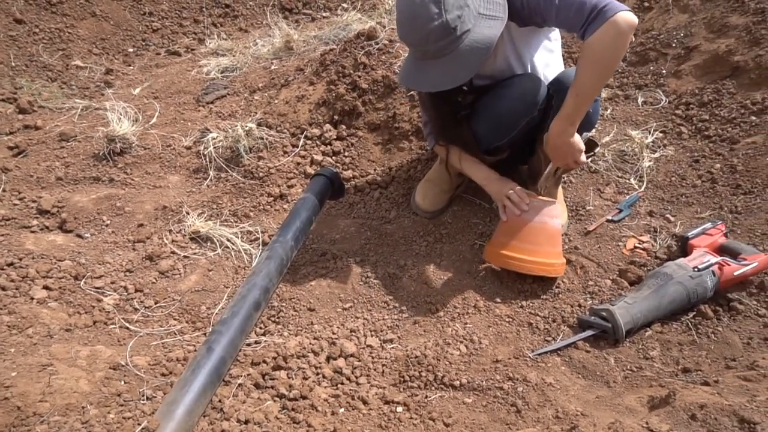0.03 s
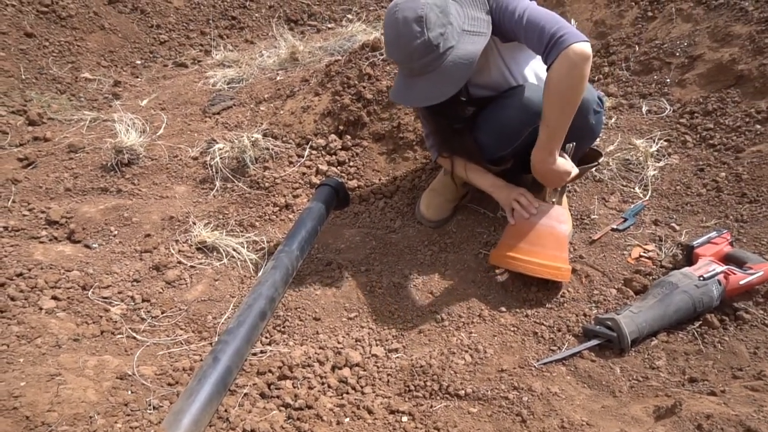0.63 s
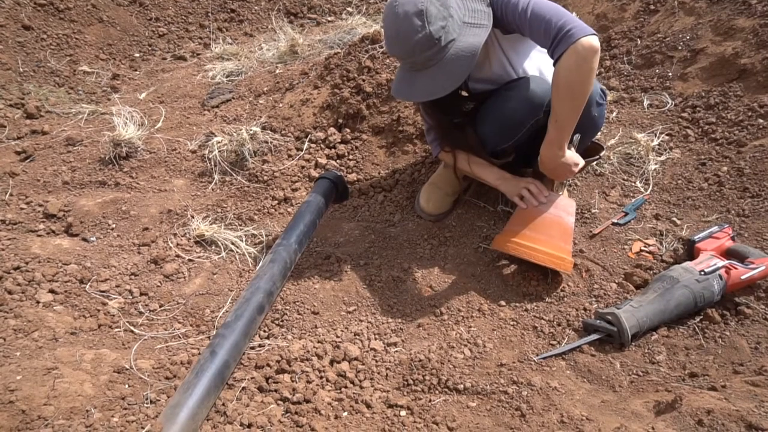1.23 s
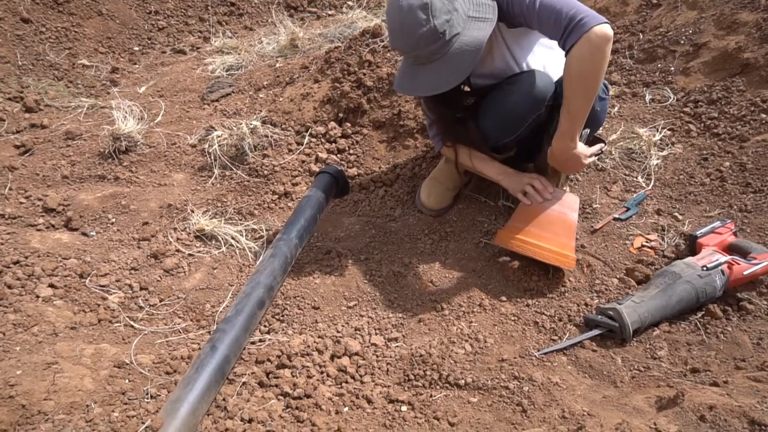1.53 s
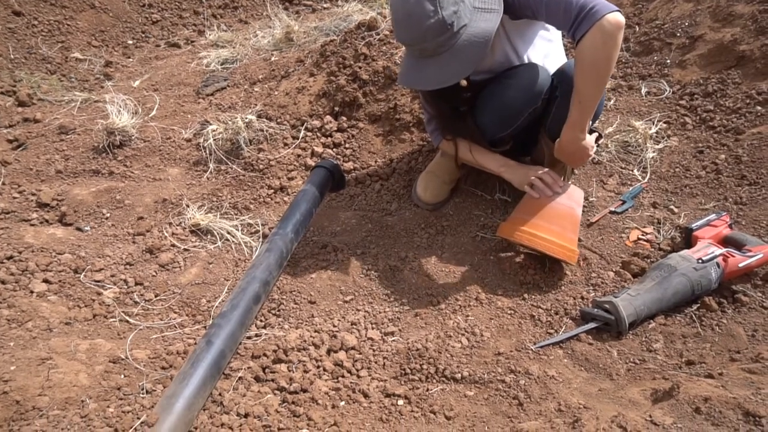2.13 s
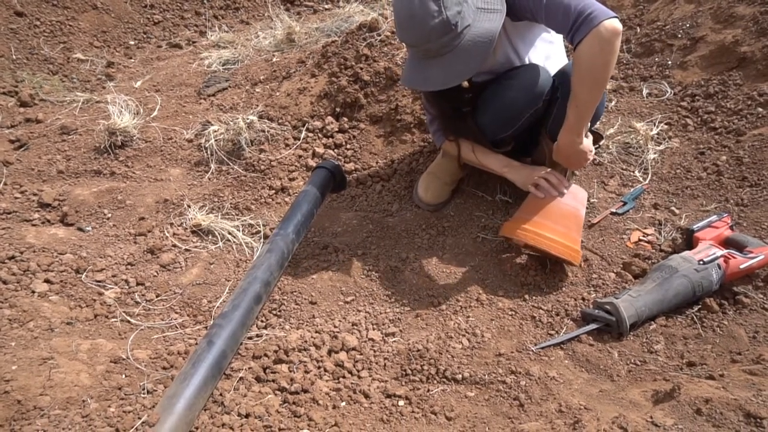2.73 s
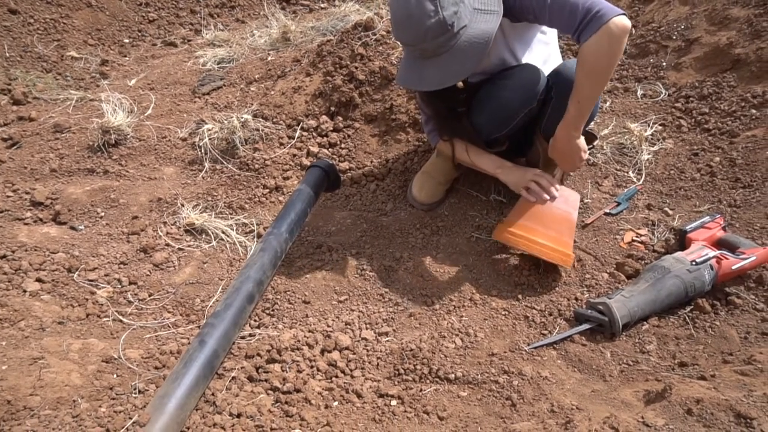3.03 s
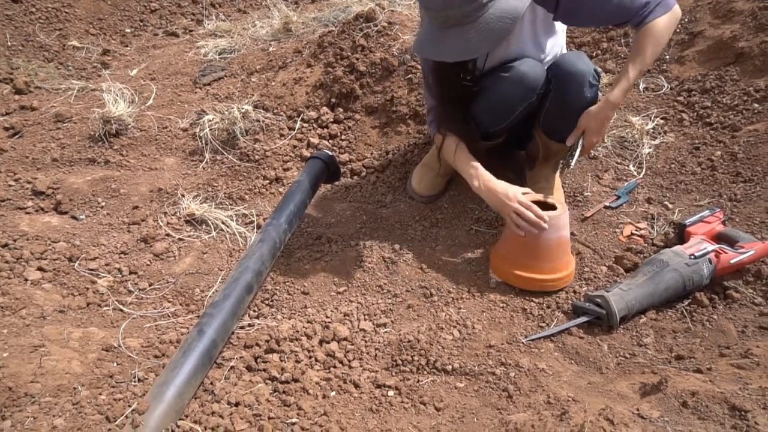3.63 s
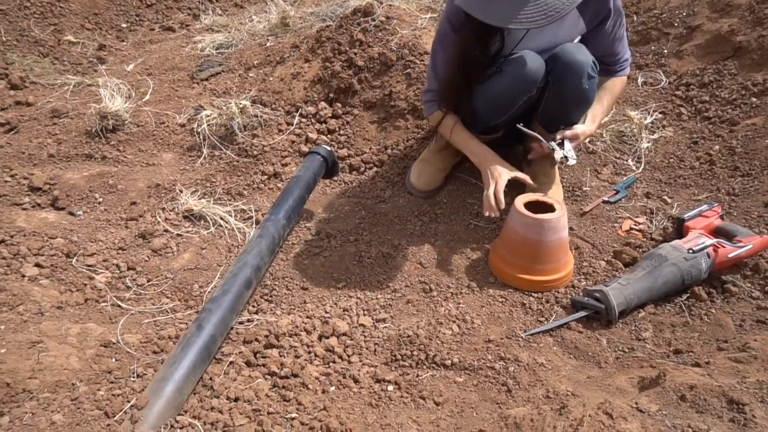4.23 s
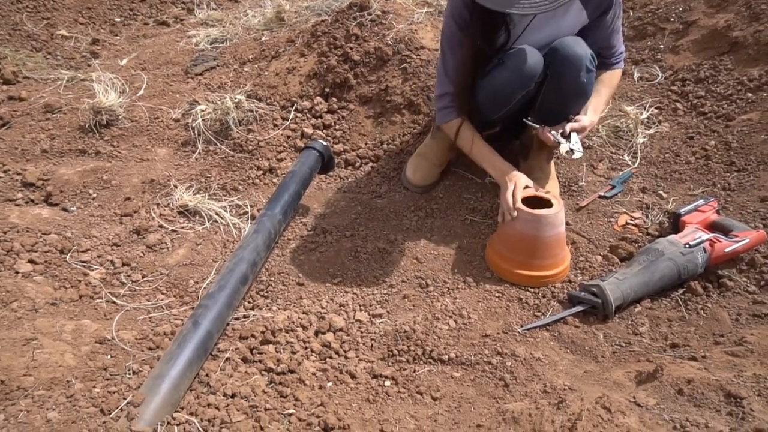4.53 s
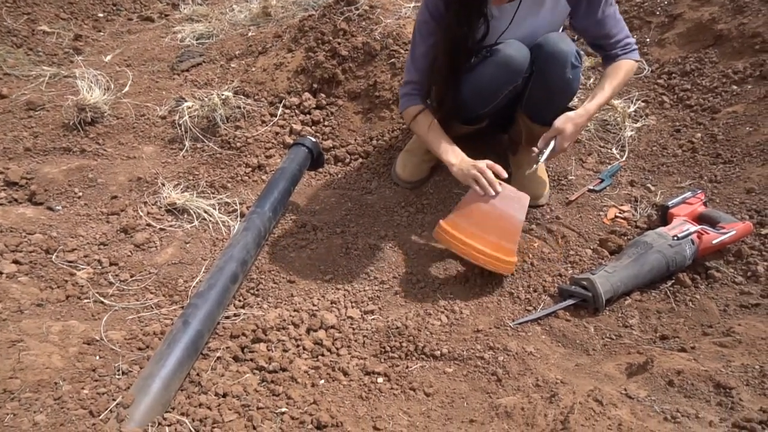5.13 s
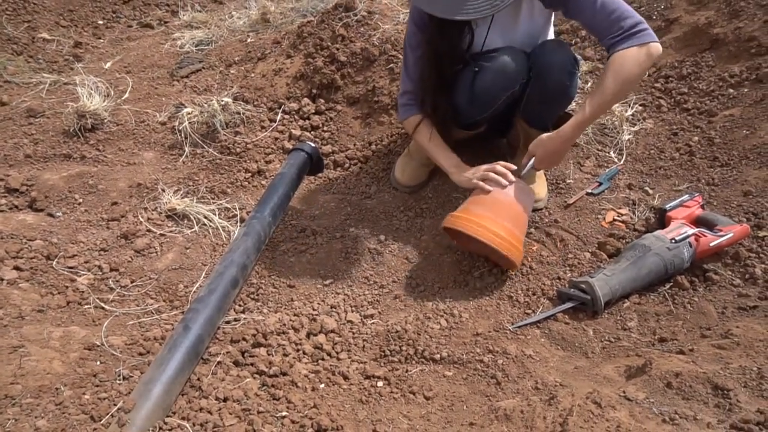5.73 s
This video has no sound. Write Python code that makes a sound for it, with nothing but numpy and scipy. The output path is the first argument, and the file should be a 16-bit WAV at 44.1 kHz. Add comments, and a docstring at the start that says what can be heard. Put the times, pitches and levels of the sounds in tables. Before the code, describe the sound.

Close ticks of pliers chipping a clay pot, a loud crunch, a metal clack, then the pot dragged over grit outdoors.

```python
"""Steel pliers nibble at the hole in the base of a terracotta pot, outdoors on gravelly soil.
The jaws tick and grind on the clay, crumbs snap off, and one piece cracks away with a loud crunch.
The pot is let down and rings freely, the loose pliers clack, and the pot is dragged and tipped on grit.
The work is close, nearly straight ahead of a stereo microphone; behind it are rustling clothes,
dull thuds on the ground, a faint hiss and light wind on the microphone."""
import sys
import numpy as np
from scipy import signal
from scipy.fft import rfft, irfft, next_fast_len
from scipy.io import wavfile

SR = 44100
rng = np.random.default_rng(int(sys.argv[2]) if len(sys.argv) > 2 else 0)


def file_out(sig):
    """Save sig as 16-bit WAV at sys.argv[1]."""
    # one column per channel
    cols = np.atleast_2d(sig).T
    # limit, then scale
    lim = np.clip(cols, -1, 1)
    pcm = np.round(lim * 32767).astype(np.int16)
    wavfile.write(sys.argv[1], SR, pcm)


N = 255339
T = np.arange(SR // 2) / SR  # time since a contact [s]

# Levels are relative within each table; tilts pivot at 4500 Hz.
# jaws catching the clay: (time [s], level [dB], tilt [dB/octave], attack noise [dB], top treble [dB])
BITES = [(0.395, -30.5, -11, -12, -5), (0.5894, -28, 1, -4, -3), (0.6087, -22.5, 4, -1.5, -1),
         (0.7093, -32, -3, -3, 2), (0.8724, -29.5, -8, 2, 11), (0.9365, -28, 0, 5, -5),
         (0.9504, -26, -1.5, 9, -5), (1.085, -29.5, 3.5, -1, 0), (1.1868, -32.5, 2, 12, -3.5),
         (2.011, -30, 2.5, -16, 4), (2.0578, -32.5, 12, -1, 1), (2.1069, -21.5, -8.5, 6, 14),
         (2.2532, -31.5, 4.5, 10, -10), (2.2712, -29.5, -0.5, 8, 0), (2.3975, -32.5, -5, -6, 9),
         (2.9903, -9.5, -1, 0, 0.5), (3.1294, -4, 0.5, 3, -9.5), (3.1614, -18.5, 15, 1, -14)]
# jaws sliding on the clay: (time [s], length [s], level [dB], tilt [dB/octave])
GRINDS = [(0.589, 0.0077, -31, -3.5), (0.633, 0.01, -33.5, 11), (0.643, 0.063, -43.5, 1.5),
          (0.731, 0.054, -53, 0), (0.851, .044, -49, -5.5), (1.084, 0.04, -45, 3), (1.137, .04, -51.5, -3),
          (1.299, 0.052, -52, 1.5), (1.423, 0.058, -55, 6), (1.479, 0.069, -50.5, 2.5),
          (1.605, .037, -55.5, -3.5), (1.778, 0.045, -46, 10), (1.826, 0.031, -48.5, 17),
          (2.058, 0.045, -48, -1), (2.37, 0.03, -57, 13), (3.144, 0.0092, -30.5, -6.5)]
# dull bumps on the soil, from the pot or a foot: (time [s], level [dB], pitch [ratio])
BUMPS = [(0.3941, -22.5, 0.94), (0.6068, -18.5, 0.98), (.9485, -32.5, 0.94), (1.086, -35, 0.68),
         (1.184, -37, 0.93), (2.1065, -20.5, 1.02), (2.273, -31, 0.97), (2.917, -20.5, 0.87),
         (2.935, -16.5, 1.05), (3.129, -20, 0.76), (3.745, -37, 0.61), (4.574, -38.5, 0.88),
         (4.985, -34, 0.78), (5.253, -34.5, 1)]
# short, sharp events: (time [s], level [dB], tilt [dB/octave])
CRUMB_SNAPS = [(0.134, -25, 3.5), (0.151, -26, 2), (0.3994, -32.5, 4), (0.708, -31.5, 1),
               (0.8874, -18, 4.5), (0.9007, -24.5, 3), (1.3242, -32, 2), (1.4538, -30, -2.5),
               (1.4944, -33.5, -10), (2.7556, -27, -1), (2.7762, -30.5, -3), (3.435, -42.5, -9.5),
               (4.3828, -39, -4.5), (5.4988, -34.5, 0.5)]  # crumbs breaking off
CRACK_JUMPS = [(2.9064, -21, 1), (2.9112, -24, -2), (2.9155, -14, -0.5), (2.9199, -14, -1),
               (2.925, -15.5, 6.5), (2.929, -25, -2.5), (2.9345, -15, -1), (2.938, -19.5, 1)]  # the crack that frees the piece
CLACKS = [(3.912, -29, 8), (3.9175, -15, 0), (3.9215, -1, 0), (3.9257, -0.5, 7.5), (3.932, -11.5, 2),
          (3.952, -14.5, 9), (3.9949, -20, 7), (4.1025, -28, 3), (4.472, -28, 4)]  # the loose pliers
STONE_KNOCKS = [(3.045, -31, -2), (3.743, -25.5, -5.5), (4.84, -29, 0.5), (4.905, -26.5, 16),
                (4.914, -19.5, -4), (4.968, -13, 5.5), (5.043, -26, -3), (5.053, -20, 3), (5.104, -56, -7),
                (5.184, -31, -4), (5.223, -28.5, -6.5)]  # the free pot striking stones
# the rim on the soil, one stroke as it is let down, one as it is pulled and tipped: (time [s], force [dB])
DRAG_STROKES = [
    [(3.3, -73.5), (3.56, -60), (3.70, -53.5), (3.75, -45), (3.83, -61), (3.885, -52), (3.93, -64)],
    [(4.5, -65), (4.56, -57), (4.63, -70), (4.70, -56), (4.89, -51), (4.97, -42), (5.02, -52.5),
     (5.09, -36), (5.14, -51), (5.19, -48.5), (5.3, -52), (5.38, -68), (5.5, -59), (5.57, -93)],
]
# effort of the crouching worker, heard as rustling of clothes and soil: (time [s], level [dB])
EFFORT = [(0.0, -71.5), (1.71, -69.5), (2.03, -61), (3.19, -66), (3.48, -67.5), (3.74, -65.5),
          (4.01, -69.5), (4.24, -68), (5.06, -67), (5.42, -69), (5.79, -68.5)]
# low wind swells and two short, dull thuds on the ground: (peak time [s], half length [s], level [dB])
LOW_SWELLS = [(2.05, 0.17, -65), (2.58, 0.21, -62.5), (3.044, .04, -61), (3.668, .025, -48),
              (4.585, .04, -44), (5.267, 0.081, -64)]

# modes: (frequency [Hz], level [dB], t60 [s])
GRIPPED_MODES = [(1296, -15, 0.01), (1653, -35.5, 0.21), (2535, -19.5, 0.13), (3895, -3, 0.041),
                 (4810, -14, .06), (5120, -14.5, 0.067), (5457, 0.5, 0.057), (5594, -6, 0.02),
                 (6020, -1, 0.047), (6510, -17.5, 0.071), (7300, -13, 0.055), (8230, -9.5, 0.049),
                 (9400, -35.5, .035), (11100, -32, 0.1)]  # the pot with the jaws on it, besides its wall mode
BUMP_MODES = [(340, -15.5, 0.013), (502.6, -4.5, 0.037), (635.5, -2, 0.026), (1180, -32, 0.0086)]  # damped rocking and bumps on the soil
BENDING_MODES = [(606, -9.5, 0.45), (1613, -3, 0.17)]  # the free pot flexing
UPPER_MODES = [(1010, -28, 0.15), (2014, 6, 0.056), (2508, 4.5, 0.098), (2881, -3.5, 0.27),
               (3575, 4.5, 0.098), (3920, -6, .08), (4260, -9, 0.089), (4694, -3.5, 0.096),
               (5260, 7.5, 0.03), (5680, -5, .08), (5790, -4, 0.08), (6590, 2.5, 0.034), (7200, -4, .1),
               (8140, -3, 0.068), (8740, -18.5, .07), (9100, -31.5, 0.041), (9600, -17.5, .06),
               (10300, -17.5, 0.089)]  # the rest of the free pot's ring
PIECE_MODES = [(542, -7, 0.049), (694, -13.5, 0.047), (1600, -27, 0.2), (1996, 0, 0.088), (3890, 1, 0.037),
               (4535, -8, 0.046), (5710, 0, 0.042), (6230, -5, 0.044), (7090, -2.5, 0.05), (7340, -9, .04),
               (7260, -1, 0.045), (8700, -15, 0.032), (9880, -7, 0.029)]  # the loosening piece, squeezed in the jaws
JAW_MODES = [(2943, -2.5, 0.019), (5220, -6.5, 0.065), (6044, -2.5, 0.054), (8400, -10.5, 0.055),
             (9730, 0, 0.022), (13700, -16.5, .04)]  # the steel jaws
TIP_MODES = [(6100, -14.5, .15), (7690, -1.5, 0.076)]  # their tips
HANDLE_MODES = [(3020, 2, 0.97)]  # the handles

# spectra: (frequency [Hz], density [dB])
CLAY_SPECTRUM = [(100, -45), (200, -14), (400, -3.5), (900, -22.5), (1300, -6), (1800, -1.5), (2800, -5.5),
                 (5500, 2), (8500, -1), (12000, -9.5), (16000, -27)]  # steel on clay
CRUMB_SPECTRUM = [(200, -21), (1000, -20), (2000, -13.5), (3000, -3), (6000, -5.5), (9000, -3),
                  (12000, -17), (16000, -24.5)]  # snapping crumbs
BREAK_SPECTRUM = [(100, -46.5), (200, -24), (320, -28.5), (550, -16), (1000, -5.5), (1900, 3.5),
                  (3000, 1.5), (4200, 10.5), (6300, -1.5), (7600, 7), (10000, 1), (12000, -5.5),
                  (16000, -14.5)]  # the running crack
METAL_SPECTRUM = [(200, -43), (700, -28.5), (1100, -5), (2000, -15), (2900, 3), (3900, -2), (5000, 7.5),
                  (6800, -3.5), (9200, 3.5), (10500, -13), (12500, -4), (16000, -25.5)]  # steel on steel
GRIT_SPECTRUM = [(90, -33), (200, -5.5), (400, 10), (1000, 0), (2500, 0), (5500, 0), (8500, 3), (11000, -8),
                 (16000, -16.5)]  # grit under the rim
RUMBLE_SPECTRUM = [(15, 1), (35, 2.5), (75, -3), (110, -16), (250, -32), (1000, -74.5)]  # wind on the microphone and ground thuds
RUSTLE_SPECTRUM = [(60, -6.5), (150, -1.5), (350, 1.5), (650, 0), (1100, -8.5), (2500, -22.5), (6000, -23),
                   (16000, -31)]  # clothes and soil
HISS_SPECTRUM = [(200, -22), (1200, 3.5), (3000, 0), (6000, -1), (10000, -3.5), (16000, -4.5)]  # steady background


def nibbling():
    """The jaws catch and slide on the clay and crumbs snap off; the pot or a foot bumps the soil."""
    out = np.zeros(N)
    for s, db, tilt_db, crack_db, top_db in BITES:
        add(out, s, amp(db - 12) * gripped_pot(tilt_db, crack_db, top_db))
    for s, length, db, tilt_db in GRINDS:
        add(out, s, amp(db + 0.3) * grind(length, tilt_db))
    for s, db, pitch in BUMPS:
        add(out, s, amp(db - 9.5) * bump(pitch, cut_hz=244))
    for s, db, tilt_db in CRUMB_SNAPS:
        add(out, s, amp(db - 8) * crack(CRUMB_SPECTRUM, tilt_db, t60=0.033, rise=0.0006))
    return out


def gripped_pot(tilt_db, crack_db, top_db, pitch=1):
    """The pot answers the jaws: the grip shifts its wall mode, a blunt contact mutes the top treble."""
    wall_hz = 2028 * (1 + 0.005 * rng.standard_normal())
    modes = ring([(wall_hz, 1.5, 0.062)], tilt_db) + ring(GRIPPED_MODES, tilt_db, pitch)
    blow = modes + amp(crack_db) * crack(CLAY_SPECTRUM, tilt_db, t60=0.024)
    shelf = [(6200, 0.0031), (7800, top_db)]
    return onset_unit(filtered(blow, lambda hz: amp(along(shelf, hz))))


def grind(length, tilt_db):
    """A slide of tiny slips rings and rocks the pot; light, bright slides hardly rock it."""
    stroke = (1 - np.exp(-T / (0.12 * length))) * np.exp(-(T / length) ** 6)
    slips = stroke * grains(len(T), rate=1800, spread_db=4)
    pitch = 1 + 0.008 * rng.standard_normal()  # the modes move as the jaws reach a new spot
    pot = gripped_pot(tilt_db, crack_db=1.5, top_db=-2, pitch=pitch)
    rocking = amp(-11 - abs(tilt_db)) * driven(slips, bump(pitch=1, cut_hz=210))
    return driven(slips, pot) + rocking


def bump(pitch, cut_hz):
    """A dull, quickly damped knock on the soil, with little bass."""
    low_cut = signal.butter(3, pitch * cut_hz, "high", fs=SR, output="sos")
    return onset_unit(signal.sosfilt(low_cut, ring(BUMP_MODES, pitch=pitch)))


def fracture():
    """The crack runs in jumps; each is a burst of tiny breaks that also rings the loosening piece."""
    out = np.zeros(N)
    attack = 1 - np.exp(-T / 0.0005)
    for s, db, tilt_db in CRACK_JUMPS:
        breaks = colour(grains(len(T), rate=16000, spread_db=2), BREAK_SPECTRUM, tilt_db)
        piece = amp(-1) * onset_unit(ring(PIECE_MODES, tilt_db))
        add(out, s, amp(db - 0.5) * attack * (breaks * decay(t60=0.053) + piece))
    return out


def clacking():
    """The slack joint lets the steel halves of the pliers strike each other and rebound."""
    out = np.zeros(N)
    for s, db, tilt_db in CLACKS:
        strike = crack(METAL_SPECTRUM, tilt_db, t60=0.013)
        tail = amp(-14.5) * crack(METAL_SPECTRUM, tilt_db, t60=0.049)
        tones = amp(-16.5) * ring(JAW_MODES) + amp(-38) * ring(TIP_MODES) + amp(-45) * ring(HANDLE_MODES)
        add(out, s, amp(db - 4.5) * (strike + tail + tones))
    # the tips meet squarely once and ping until the closing hand stills them
    shut_s, hold_s = 3.9271, 0.038
    add(out, shut_s, amp(-14.5) * ring(TIP_MODES) * np.exp(-(T / hold_s) ** 6))
    return out


def dragging():
    """Grit under the rim keeps the pot ringing, more strongly while tipped; larger stones knock it."""
    force = sum(gain_curve(stroke, outside_db=-120) for stroke in DRAG_STROKES)
    tipped = swell(s=5.1, half_s=0.23, power=8)  # 0 seated on the rim, 1 up on its edge
    contacts = force * grains(N, rate=900, spread_db=4)
    bending = driven(contacts * amp(-7 + 10.5 * tipped), ring(BENDING_MODES))
    upper_body = ring(UPPER_MODES) + amp(3) * crack(GRIT_SPECTRUM, tilt_db=0, t60=0.016)
    scrape = amp(3) * driven(contacts, upper_body)
    grit = colour(grains(N, rate=2200, spread_db=8), GRIT_SPECTRUM)
    crunch = force * amp(-5 - 8 * tipped) * grit
    out = bending + scrape + crunch
    for s, db, tilt_db in STONE_KNOCKS:
        modes = ring(BENDING_MODES + UPPER_MODES, tilt_db)
        attack = amp(6.5) * crack(GRIT_SPECTRUM, tilt_db, t60=0.013)
        add(out, s, amp(db - 10) * onset_unit(modes + attack))
    return out


def crumbling():
    """As the weight shifts, single grains give way under the gripped pot."""
    ticks = gain_curve(EFFORT) * grains(N, rate=45, spread_db=3)
    return amp(-5) * driven(ticks, gripped_pot(tilt_db=-1, crack_db=10.5, top_db=-3.5))


def settling():
    """Dry sand slides from under the rim as it takes the pot's weight."""
    sand = colour(grains(N, rate=6000, spread_db=5), CRUMB_SPECTRUM, tilt_db=-2.5)
    return amp(-56) * swell(s=4.04, half_s=0.09) * sand


def ground_scatter(x, spectrum, t60):
    """The rough ground returns a different diffuse tail to each side of the microphone."""
    tails = np.array([crack(spectrum, 0, t60) for side in range(2)])
    return signal.fftconvolve(x[None], tails / np.linalg.norm(tails[0]), axes=1)[:, :N]


def outdoors():
    """Light wind on the microphone, two dull ground thuds, rustling clothes and soil, and faint hiss."""
    low_gain = amp(-69.5) + sum(amp(db) * swell(s, half_s) for s, half_s, db in LOW_SWELLS)
    rumble = low_gain * stereo_noise(RUMBLE_SPECTRUM, width=0.66)
    rustle = amp(7) * gain_curve(EFFORT) * stereo_noise(RUSTLE_SPECTRUM, width=0.74)
    hiss = amp(-60.5) * stereo_noise(HISS_SPECTRUM, width=0.72)
    return rumble + rustle + hiss


def stereo_noise(spectrum, width):
    """Noise at rms 1; width is the ratio of side to mid."""
    mid, side = rng.standard_normal((2, N))
    return colour(np.array([mid + width * side, mid - width * side]), spectrum)


def ring(modes, tilt_db=0, pitch=1):
    """Decaying modes; each contact point excites them a little differently."""
    hz, db, t60 = np.transpose(modes)[:, :, None]
    size = amp(db + tilt_db * octaves(hz) + 0.71 * rng.standard_normal(hz.shape))
    sign = rng.choice([-1, 1], hz.shape)
    return np.sum(size * sign * decay(t60) * np.sin(2 * np.pi * pitch * hz * T), axis=0)


def crack(spectrum, tilt_db, t60, rise=0.00024):
    """A crowd of damped modes, as a burst of noise; the contact takes a moment to build."""
    noise = colour(rng.standard_normal(len(T)), spectrum, tilt_db)
    return noise * decay(t60) * (1 - np.exp(-T / rise))


def grains(n, rate, spread_db):
    """Random tiny impacts of uneven size, about rate a second, at rms 1."""
    hits = (rng.random(n) < rate / SR) * rng.choice([-1, 1], n)
    return unit(hits * amp(spread_db * np.clip(rng.standard_normal(n), -2, 2)))


def driven(contacts, body):
    """A body shaken by a run of contacts, at their level."""
    return signal.fftconvolve(contacts, body / np.linalg.norm(body))[:len(contacts)]


def decay(t60):
    """A gain that falls 60 dB in t60 seconds."""
    return amp(-60 * T / t60)


def swell(s, half_s, power=2):
    """A bell that peaks at 1 at time s; higher powers flatten its top."""
    return np.exp(-((np.arange(N) / SR - s) / half_s) ** power)


def gain_curve(points, outside_db=None):
    """One gain per sample from (time [s], level [dB]) points."""
    s, db = np.transpose(points)
    return amp(np.interp(np.arange(N) / SR, s, db, outside_db, outside_db))


def colour(x, spectrum, tilt_db=0):
    """x given a tilted spectrum, at rms 1."""
    return unit(filtered(x, lambda hz: amp(along(spectrum, hz) + tilt_db * octaves(hz))))


def filtered(x, response):
    """x through a frequency response."""
    size = next_fast_len(x.shape[-1] + 8192)
    hz = np.fft.rfftfreq(size, 1 / SR)
    return irfft(rfft(x, size) * response(hz), size)[..., :x.shape[-1]]


def along(points, hz):
    """(frequency [Hz], level [dB]) points read on a log axis."""
    point_hz, db = np.transpose(points)
    return np.interp(np.log(hz + 1), np.log(point_hz + 1), db)


def octaves(hz):
    """Octaves from the mid-treble pivot of every tilt."""
    return np.log2(np.clip(hz, 1000, 12000) / 4500)


def amp(db):
    """Decibels to gain."""
    return 10 ** (np.asarray(db) / 20)


def unit(x):
    """Scale to rms 1."""
    return x / np.sqrt(np.mean(x ** 2) + 1e-20)


def onset_unit(x):
    """Scale a blow so that its first 4 ms have rms 1."""
    return x / np.sqrt(np.mean(x[:SR // 250] ** 2))


def add(track, s, x):
    """Mix x in from time s."""
    part = track[max(round(s * SR), 0):][:len(x)]
    part += x[:len(part)]


def scene():
    """The work lies nearly straight ahead of two closely spaced microphone ports, over open ground."""
    work = nibbling() + crumbling() + fracture() + clacking() + dragging() + settling()
    left_lag_s = 1.2e-5  # sound reaches the left port this much later than the right
    pair = np.array([work, work])
    direct = filtered(pair, lambda hz: np.exp(1j * np.pi * left_lag_s * np.outer([-1, 1], hz)))
    near_ground = amp(-22.5) * ground_scatter(work, CRUMB_SPECTRUM, t60=0.0086)
    far_ground = amp(-32) * ground_scatter(work, GRIT_SPECTRUM, t60=0.55)
    return direct + near_ground + far_ground + outdoors()


def record(dry):
    """The camera rounds off the highest peaks and keeps nothing above its band limit."""
    ceiling, top_hz = 0.95, 16300
    rounded = dry / (1 + np.abs(dry / ceiling) ** 6) ** (1 / 6)
    return filtered(rounded, lambda hz: 1 / np.sqrt(1 + (hz / top_hz) ** 120))


dry = scene()
out = record(dry)
file_out(out)
```